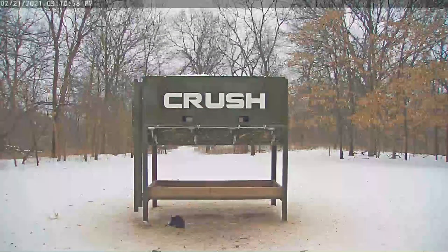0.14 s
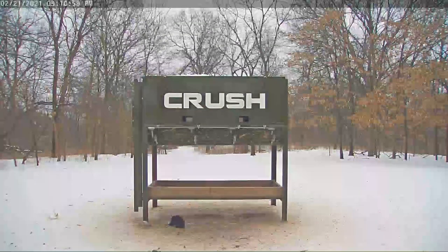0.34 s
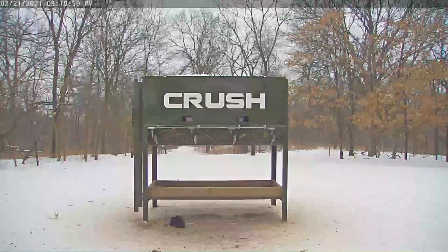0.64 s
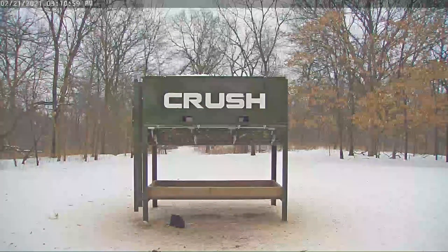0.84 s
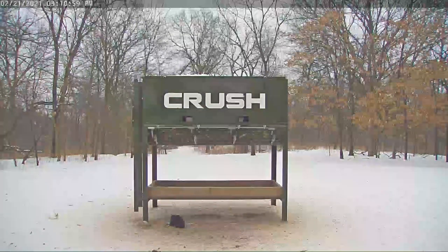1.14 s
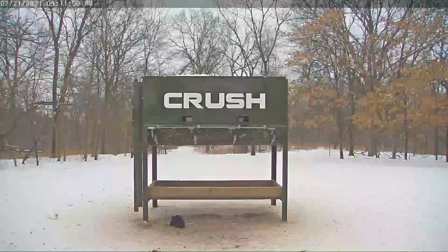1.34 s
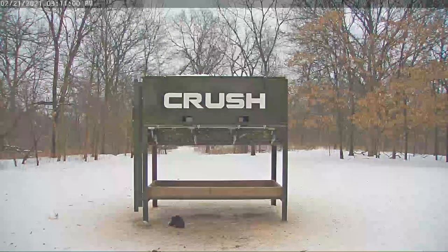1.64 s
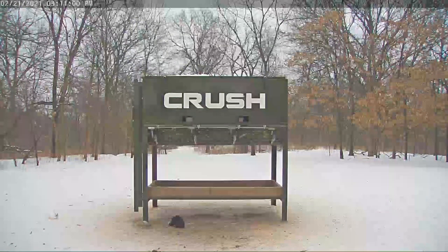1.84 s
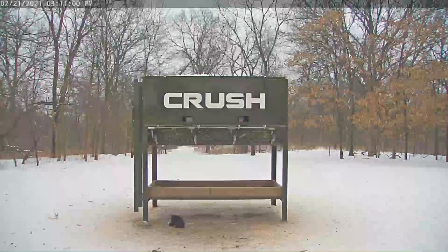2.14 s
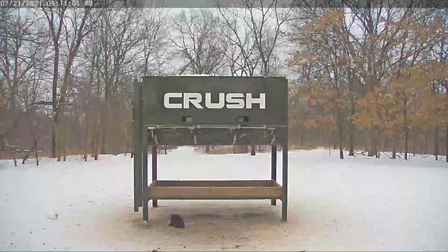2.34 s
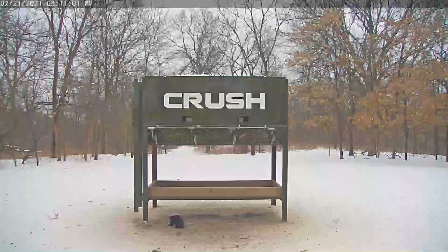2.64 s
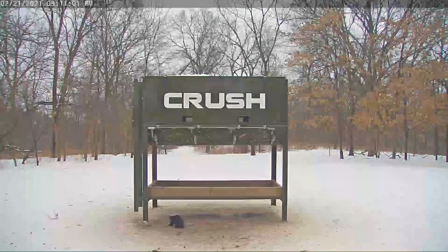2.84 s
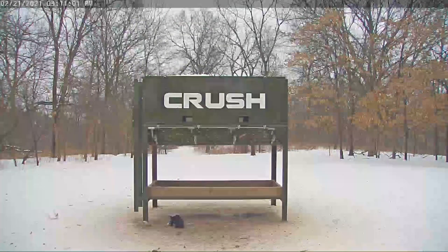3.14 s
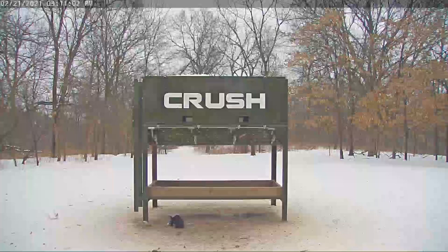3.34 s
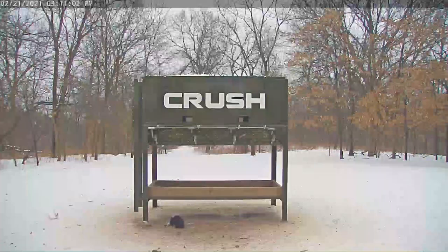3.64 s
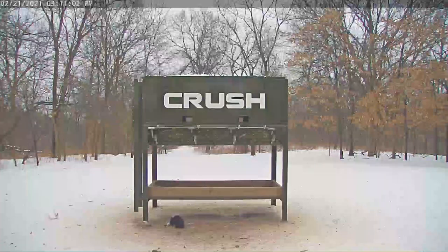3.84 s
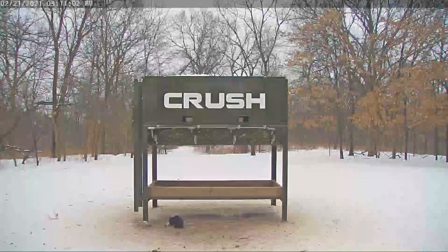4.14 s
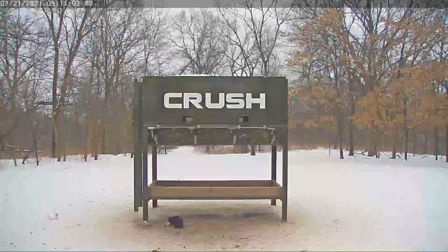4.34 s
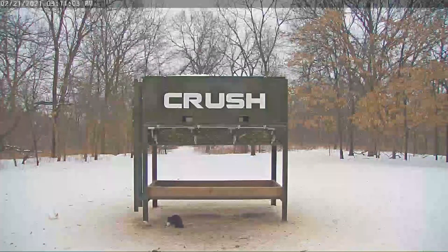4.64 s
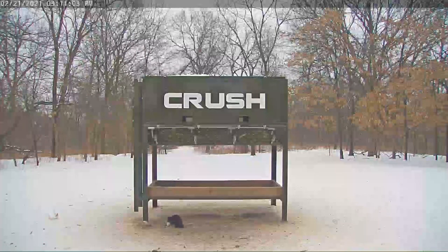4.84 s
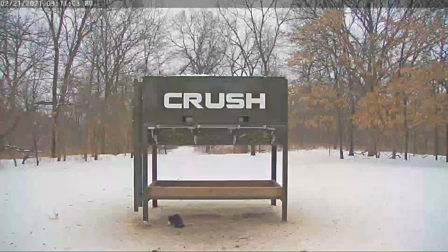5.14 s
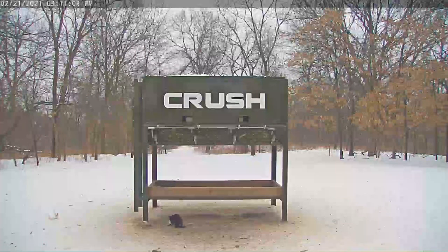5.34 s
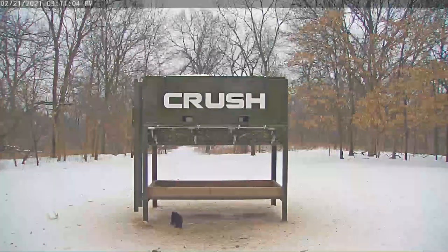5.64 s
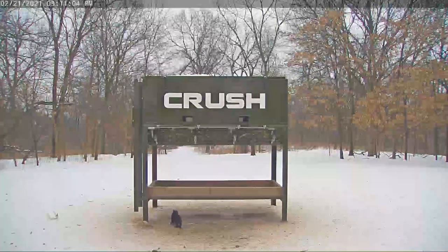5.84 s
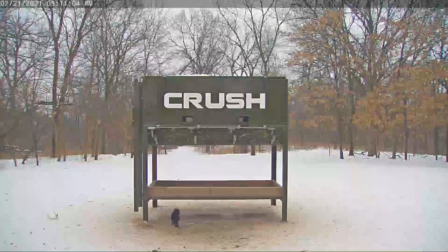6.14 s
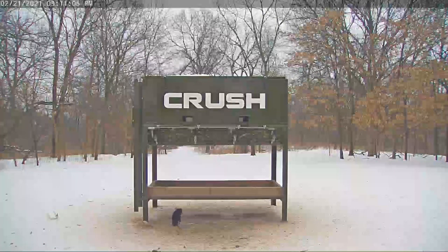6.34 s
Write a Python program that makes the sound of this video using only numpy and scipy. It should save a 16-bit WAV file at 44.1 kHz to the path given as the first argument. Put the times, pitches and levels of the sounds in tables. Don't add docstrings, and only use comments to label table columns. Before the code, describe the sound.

A quiet snowy wood heard through a small, narrow-band outdoor microphone. A steady low 60-hertz hum, soft airy hiss, faint electronic whine and far traffic last throughout. A dying far bird note opens; hoarse chucks follow at 0.2, 0.7 and 1.0 s, with small chips and a lone wooden knock near 1.0. Soft, clear arched calls around 700 hertz come at 1.5, 2.2, 2.9 and 3.6. A woodpecker drums rapidly from 2.3 to 2.9. Loud chips lead into a falling harsh scream at 3.0, a chuck and knock at 3.2, and a short rising scream at 3.5. Tiny husk ticks are scattered about. After a lull, a loud chip and rasp at 4.55 precede a long scream at 4.8, another at 5.1, thin high whistles and a chuck at 5.26. Traffic nears, a distant motor drones from 5.6, and chips sound at 6.0 and 6.25. Trees return a soft tail.

```python
import sys
import numpy as np
from scipy import signal
from scipy.fft import rfft, irfft
from scipy.io import wavfile

SR = 44100
rng = np.random.default_rng(int(sys.argv[2]) if len(sys.argv) > 2 else 0)


def gain_from_db(level_db):
    decades = np.asarray(level_db, float) / 20
    return 10 ** decades


def transcribe(signal):
    frames = np.atleast_2d(signal).T
    limited = np.clip(frames, -1, 1)
    pcm = np.round(limited * 32767).astype(np.int16)
    wavfile.write(sys.argv[1], SR, pcm)


N = 286650


def rms_one(x):
    return x / np.sqrt(np.mean(x ** 2) + 1e-20)


def at_hz(points, hz):
    points = np.array(points)
    return np.interp(np.log(hz), np.log(points[:, 0]), points[:, 1])


def in_time(rows):
    s, *columns = np.transpose(rows)
    return [np.interp(np.arange(N) / SR, s, c) for c in columns]


def filtered(x, spectrum):
    hz = np.maximum(np.fft.rfftfreq(N, 1 / SR), 1)
    return irfft(rfft(x) * gain_from_db(at_hz(spectrum, hz)), N)


def coloured(spectrum):
    return rms_one(filtered(rng.standard_normal(N), spectrum))


def wobble(rate_hz, size):
    knots = signal.lfilter([1], [1, -.5], rng.standard_normal(2000))
    return rms_one(np.interp(np.arange(size) * rate_hz / SR % 1999, np.arange(2000), knots))


def ring(clicks, hz, t60_s):
    radius, angle = gain_from_db(-60 / (t60_s * SR)), 2 * np.pi * hz / SR
    return signal.lfilter([0, np.sin(angle)], [1, -2 * radius * np.cos(angle), radius ** 2], clicks + 1e-18)


def add(out, start_s, sound, fade_s=0.0013):
    i = max(round(start_s * SR), 0)
    sound = sound[:N - i]
    k = np.arange(len(sound))
    out[i:i + len(sound)] += sound * np.clip(np.minimum(k, k[::-1]) / (fade_s * SR), 0, 1)


def voice(rows, throat, jitter, rough, smear_hz):
    s, *columns = np.transpose(rows)
    t = np.arange(s[0], s[-1], 1 / SR)
    pitch_hz, level_db, tilt_db = [np.interp(t, s, c) for c in columns]
    phase = 2 * np.pi * np.cumsum(pitch_hz * (1 + jitter * wobble(90, len(t)))) / SR
    partials = np.arange(1, 13)[:, None]
    hz = partials * pitch_hz
    gains = gain_from_db(at_hz(throat, hz) + tilt_db * np.log2(hz / 2000))
    gains /= np.sqrt(np.sum(gains ** 2, axis=0) / 2)
    turn = partials * phase + rng.uniform(0, 2 * np.pi, partials.shape)
    noisy = 1 - (1 - rough) ** partials
    a, b = [np.array([wobble(smear_hz * k, len(t)) for k in partials[:, 0]]) for part in "ab"]
    rasp = (a * np.sin(turn) + b * np.cos(turn)) / np.sqrt(2)
    mixed = np.sqrt(1 - noisy) * np.sin(turn) + np.sqrt(noisy) * rasp
    return gain_from_db(level_db) * np.sum(gains * mixed, axis=0)


def calls(tables, throat, jitter, rough, smear_hz, fade_s):
    out = np.zeros(N)
    for rows in tables:
        add(out, rows[0][0], voice(rows, throat, jitter, rough, smear_hz), fade_s)
    return out


# multiple, level_db (rms)
HUM = [(1, -53.5), (3, -67), (5, -76.5), (7, -75), (9, -88.5)]
# centre_hz, width_hz, level_db (rms)
CAMERA_WHINE = [(2100, 41, -89.5), (4200, 160, -85), (4760, 85, -94.5)]


def camera():
    mains_hz = 59.976
    t = np.arange(N) / SR
    hum = sum(np.sqrt(2) * gain_from_db(db) * np.sin(2 * np.pi * k * mains_hz * t + k) for k, db in HUM)
    noise = rng.standard_normal(N)
    return hum + sum(gain_from_db(db) * rms_one(ring(noise, hz, 1.4 / width)) for hz, width, db in CAMERA_WHINE)


# frequency_hz, level_db (per Hz)
AIR = [(20, -4), (40, 12.5), (120, -1.5), (230, -12), (500, -8), (1000, -1.5), (1250, -2.5), (1700, -1),
       (2150, -9), (2600, -13.5), (3300, -11), (4300, -26.5), (5200, -27), (6600, -32), (7500, -49.5)]
# frequency_hz, level_db (per Hz)
RUMBLE = [(70, -22), (105, -11.5), (121, -3), (140, -7), (300, -11.5), (500, -8), (800, -32)]
# time_s, level_db
TRAFFIC = [
    (0, 1),
    (1.6, 0.4),
    (3.1, 1.2),
    (4.3, -2),
    (4.9, 1.1),
    (5.2, 3),
    (6.5, 3),
]


def air():
    near_db, = in_time(TRAFFIC)
    hiss = gain_from_db(-65.5 + 0.42 * near_db) * coloured(AIR)
    rumble = gain_from_db(-74 + near_db) * coloured(RUMBLE)
    engine_note = gain_from_db(-81.5 + 2.5 * near_db) * rms_one(ring(rng.standard_normal(N), 117.7, 0.36))
    whine_db = -73.5 + 0.99 * near_db + 1.5 * wobble(2.5, N)
    whine = gain_from_db(whine_db) * rms_one(ring(rng.standard_normal(N), 958, 0.0092))
    return hiss + whine + rumble + engine_note


def wood(x):
    t60_s, dull_hz, build_s = 0.74, 4960, 0.0029
    t = np.arange(SR) / SR
    tail = rng.standard_normal(SR) * gain_from_db(-60 * t / t60_s) * (1 - np.exp(-t / build_s))
    tail = signal.sosfilt(signal.butter(1, dull_hz, fs=SR, output="sos"), tail)
    swaying = x * wobble(450, N)
    return signal.fftconvolve(swaying, tail / np.sqrt(np.sum(tail ** 2)))[:N]


# start_s, length_s, pitch_hz, start_db, end_db
FAR_NOTES = [
    (0, 0.17, 2126, -62.5, -77),
    (0, 0.15, 3850, -64, -81),
    (4.809, .09, 821, -60.5, -76),
    (1.41, .08, 3400, -79, -78),
    (4.249, 0.28, 3470, -78, -83),
    (5.468, 0.12, 3450, -80, -82),
    (5.629, 0.35, 3220, -73.5, -82),
]
# frequency_hz, level_db
FAR_THROAT = [(2000, 0), (4000, 0), (4200, -30), (5000, -60)]
# frequency_hz, level_db
MOTOR_BODY = [(300, -14), (470, -6), (940, -2.5), (1400, -21), (2000, -60)]


def far_sounds():
    notes = [[(s, hz, start_db, 0), (s + long, hz, end_db, 0)] for s, long, hz, start_db, end_db in FAR_NOTES]
    start_s, length_s, pitch_hz, level_db, tilt_db = 5.6, 6, 473.5, -73.5, 2.5
    rise_s, start_db = 0.21, -14
    motor = [(start_s, pitch_hz, level_db + start_db, tilt_db),
             (start_s + rise_s, pitch_hz, level_db, tilt_db),
             (start_s + length_s, pitch_hz, level_db, tilt_db)]
    birds = calls(notes, FAR_THROAT, .012, .97, 800, .02)
    return birds + calls([motor], MOTOR_BODY, .008, .4, 40, .02)


# start_s, peak_db, centre_hz
TICKS = [(.585, -53, 2100), (1.705, -61.5, 3300), (1.8223, -52.5, 2970), (2.01, -62, 3600),
         (2.1695, -65, 3380), (2.6597, -59.5, 3400), (3.449, -58, 3620), (3.5073, -52, 3000),
         (3.9756, -62, 3360), (4.352, -67.5, 2950), (5.873, -68, 3020)]


def ticks():
    out, click = np.zeros(N), np.eye(1, 900)[0]
    click = signal.sosfilt(signal.butter(2, 4500, fs=SR, output="sos"), click) * 4
    for s, db, hz in TICKS:
        crack = ring(click, .74 * hz, .004) - ring(click, hz, .005) + ring(click, 1.28 * hz, .004)
        add(out, s, gain_from_db(db - 4.5) * crack, fade_s=1 / SR)
    return out


# start_s, peak_db
DRUM = [(2.257, -55.5), (2.298, -68), (2.34, -54.5), (2.379, -59), (2.418, -54.5), (2.462, -57),
        (2.498, -52.5), (2.537, -52), (2.575, -58), (2.617, -56), (2.748, -74.5), (2.782, -56),
        (2.821, -60), (2.862, -61)]
# start_s, peak_db
KNOCKS = [
    (.972, -57.5),
    (3.191, -57.5),
]
# frequency_hz, level_db, t60_s
TRUNK = [(656, 2.5, 0.026), (1000, -0.5, 0.012), (1880, 2, 0.0068), (2770, -6.5, 0.015)]


def woodpecker():
    blows = np.vstack([DRUM, KNOCKS])
    at, out = np.round(blows[:, 0] * SR).astype(int), np.zeros(N)
    chance = rng.standard_normal((len(blows), len(TRUNK)))
    for (hz, mode_db, t60_s), spread in zip(TRUNK, chance.T):
        clicks = np.zeros(N)
        clicks[at] = gain_from_db(blows[:, 1] + mode_db + 1.5 * spread)
        out += ring(clicks, hz, t60_s)
    return signal.sosfilt(signal.butter(2, 3500, fs=SR, output="sos"), out)


def whistles(tables, jitter, flutter_db):
    out = np.zeros(N)
    for rows in tables:
        s, hz, db = np.transpose(rows)
        t = np.arange(s[0], s[-1], 1 / SR)
        phase = 2 * np.pi * np.cumsum(np.interp(t, s, hz) * (1 + jitter * wobble(100, len(t)))) / SR
        level_db = np.interp(t, s, db) + flutter_db * wobble(120, len(t))
        add(out, s[0], np.sqrt(2) * gain_from_db(level_db) * np.sin(phase))
    return out


# start_s, length_s, middle_hz, level_db
WHISTLES = [
    (5.003, .085, 7030, -71),
    (5.092, .023, 7080, -75),
    (5.125, .025, 7250, -78),
]


def thin_song():
    start_s, length_s, start_hz, end_hz, slur_db = 4.503, .042, 6250, 7750, -78
    edge_db, dip_hz_per_s = -12, 8500
    slur = [(start_s + u * length_s, start_hz + u * (end_hz - start_hz), slur_db + edge * edge_db)
            for u, edge in [(0, .7), (.3, 0), (.65, 0), (1, .5)]]
    tables = [slur]
    for s, long, hz, db in WHISTLES:
        tables.append([(s + u * long, hz + up * dip_hz_per_s * long, db + up * edge_db)
                       for u, up in [(0, 1), (.2, .4), (.55, 0), (.9, 0), (1, .3)]])
    return whistles(tables, .012, 3.5)


# start_s, length_s, top_hz, level_db
ARCHES = [
    (1.472, 0.11, 695, -55.5),
    (2.197, .122, 684, -57),
    (2.902, 0.14, 710, -56),
    (3.575, 0.11, 697, -56.5),
]
# frequency_hz, level_db
ARCH_THROAT = [(500, -28.5), (900, -11.5), (1350, 2), (1900, -0.5), (2300, -21), (2800, -25), (3200, -15.5),
               (3700, -14.5), (4200, -43), (5500, -58)]


def arches():
    depth, top_at, edge_db, tilt_db = 0.23, .47, -1, 2.5
    u = np.linspace(0, 1, 15)
    bend = np.where(u < top_at, 1 - u / top_at, (u - top_at) / (1 - top_at)) ** 2
    tables = [np.transpose([s + long * u, hz * (1 - depth * bend), db + edge_db * bend, tilt_db + 0 * u])
              for s, long, hz, db in ARCHES]
    return calls(tables, ARCH_THROAT, .012, .2, 130, .012)


# frequency_hz, level_db
CHIP_THROAT = [(500, -37), (1000, -19.5), (1400, 4), (1920, -4), (2920, -1), (3720, -4.5), (4650, -8.5),
               (5300, -24), (5900, -13), (7000, -42)]


def chips(table, fall_per_s, rough):
    out, hz = np.zeros(N), np.geomspace(300, 9000, 60)
    for s, pitch, long, db, beak_hz in table:
        fall = fall_per_s * long
        rows = [(s, pitch, db, 0),
                (s + 0.38 * long, pitch * (1 - 0.27 * fall), db, 0),
                (s + long, pitch * (1 - fall), db - 0.6, 0)]
        throat = at_hz(CHIP_THROAT, hz) + 14 * np.exp(-(np.log2(hz / beak_hz) / .2) ** 2)
        add(out, s, voice(rows, np.transpose([hz, throat]), .008, rough, 200), fade_s=.006)
    return out


# start_s, pitch_hz, length_s, level_db, beak_hz
CLEAR_CHIPS = [
    (.96, 743, 0.032, -58.5, 3660),
    (4.547, 589, 0.037, -50.5, 3310),
]
# start_s, pitch_hz, length_s, level_db, beak_hz
CHIPS = [
    (0.581, 703, 0.019, -61.5, 4580),
    (.962, 743, 0.035, -58.5, 2220),
    (.962, 716, 0.04, -57, 1510),
    (2.989, 648, 0.034, -50, 4240),
    (3.005, 574, 0.035, -53, 3160),
    (5.99, 734, 0.026, -58, 3720),
    (6.245, 745, 0.023, -50, 3670),
    (6.245, 701, 0.017, -63, 1410),
]
# start_s, pitch_hz, length_s, level_db, beak_hz
HOARSE_CHIPS = [
    (4.59, 552.4, 0.092, -60.5, 2270),
    (4.59, 567, .13, -64.5, 3380),
    (4.82, 591, .07, -58.5, 3430),
    (5.09, 578, .15, -59.5, 3770),
    (3.03, 560, 0.049, -61, 3280),
    (6.004, 708, 0.034, -61.5, 2100),
    (6.258, 693, 0.053, -60, 2030),
]
# start_s, pitch_hz, length_s, level_db, beak_hz
SLURS = [
    (.985, 751, 0.065, -58, 1880),
    (4.57, 593, 0.035, -53.5, 2200),
]


def sharp_calls():
    clear = chips(CLEAR_CHIPS, fall_per_s=2.9, rough=.07)
    coarse = chips(CHIPS, fall_per_s=2.8, rough=.2)
    hoarse = chips(HOARSE_CHIPS, fall_per_s=0.76, rough=.65)
    return clear + coarse + hoarse + chips(SLURS, fall_per_s=4.5, rough=.15)


# start_s, length_s, pitch_hz, level_db, brightness_db_per_octave
CHUCKS = [
    (0.232, 0.11, 964, -52, 1),
    (0.67, 0.098, 982, -52, 0),
    (1.041, 0.093, 1006, -52.5, -2.5),
    (3.186, 0.11, 962, -53.5, 4),
    (5.016, 0.09, 935, -55, -5),
    (5.262, 0.068, 962, -50.5, 3),
]
# frequency_hz, level_db
CHUCK_THROAT = [(400, -25), (650, -2), (950, -6.5), (1300, -24), (2000, 2.5), (2450, -13), (2950, 3),
                (3500, -15.5), (4200, -16.5), (6000, -43.5)]


def chucks():
    tables = [[(s, .97 * hz, db - 8.0, tilt - 11),
               (s + 0.39 * long, hz, db - 0.5, tilt - 4),
               (s + .7 * long, 0.95 * hz, db, tilt),
               (s + long, 1.04 * hz, db - 8.5, tilt - 2)] for s, long, hz, db, tilt in CHUCKS]
    return calls(tables, CHUCK_THROAT, .03, .7, 480, .015)


# start_s, length_s, start_hz, end_hz, level_db
SCREAMS = [
    (3.041, 0.23, 549.6, 489.3, -51.5),
    (3.535, 0.12, 513.5, 596.5, -51.5),
    (4.814, .3, 537, 487.6, -50.5),
    (5.094, 0.13, 496.6, 563, -53),
]
# frequency_hz, level_db
SCREAM_THROAT = [(700, -45.5), (850, -18.5), (1250, -17), (1560, 6.5), (1800, 3.5), (2110, 4.5), (2450, 1),
                 (2850, 1.5), (3330, 4.5), (3900, -13.5), (4500, -22), (5000, -36.5), (6500, -54.5)]


def screams():
    attack_s, release_s, start_db, end_db = .055, .07, -8.5, -6
    tilt_db = (-4, -0.5, 4.5, -3)
    tables = []
    for s, long, start_hz, end_hz, db in SCREAMS:
        at = np.array([0, attack_s, long - release_s, long])
        level_db = db + np.array([start_db, 0, 0, end_db])
        pitch_hz = start_hz + (end_hz - start_hz) * at / long
        tables.append(np.transpose([s + at, pitch_hz, level_db, tilt_db]))
    return calls(tables, SCREAM_THROAT, .011, .25, 200, .015)


# frequency_hz, level_db
MICROPHONE = [(1000, 1.5), (2400, 2.5), (2650, -3.5), (2900, 1.5), (4500, -3), (5200, -7), (6500, 0.5)]


def microphone(x):
    return filtered(x, MICROPHONE)


def scene():
    harsh, arched, short, thin, far = screams(), arches(), chucks(), thin_song(), far_sounds()
    sharp = sharp_calls()
    knocks = woodpecker() + ticks()
    direct = harsh + short + arched + sharp + knocks + thin + far
    scattered = gain_from_db(-9.0) * harsh + gain_from_db(-12.5) * short + gain_from_db(-6.5) * arched
    scattered += gain_from_db(-9.5) * sharp + gain_from_db(-14.5) * knocks + gain_from_db(-23) * thin
    return (microphone(direct + wood(scattered)) + air() + camera())[None]


def low_pass(x):
    return signal.sosfilt(signal.butter(12, 7800, fs=SR, output="sos"), x)


def record(dry):
    cutoff_hz, offset = 8060, .00919
    narrow = signal.sosfilt(signal.cheby2(10, 45, cutoff_hz, fs=SR, output="sos"), dry)
    return low_pass(narrow + offset)


dry = scene()
out = record(dry)
transcribe(out)
```